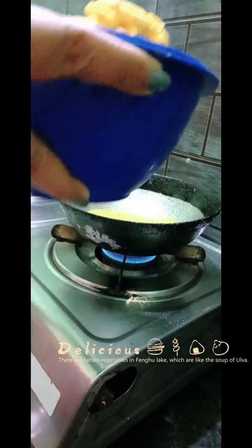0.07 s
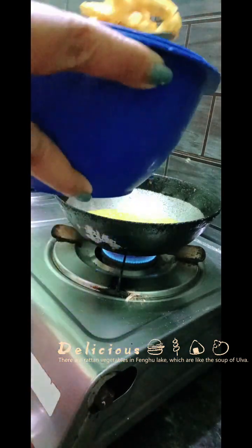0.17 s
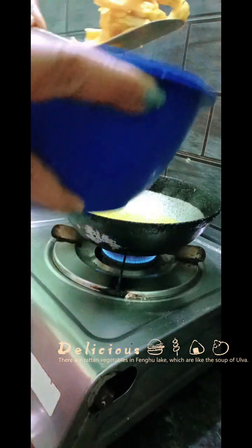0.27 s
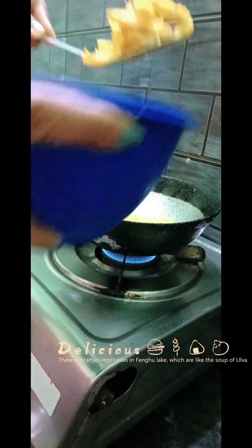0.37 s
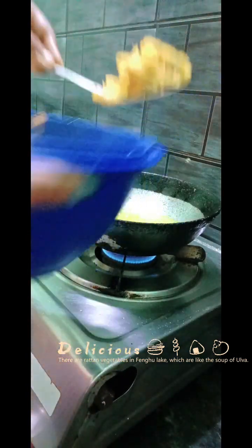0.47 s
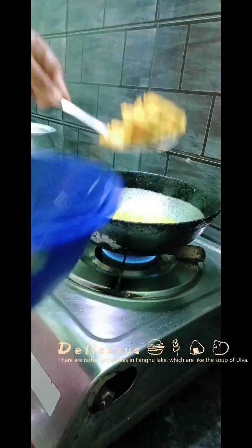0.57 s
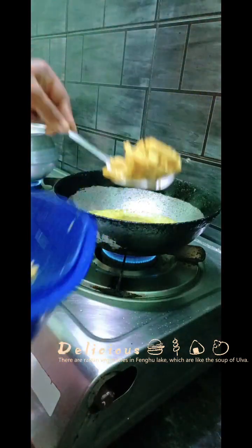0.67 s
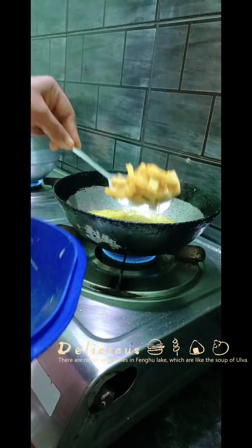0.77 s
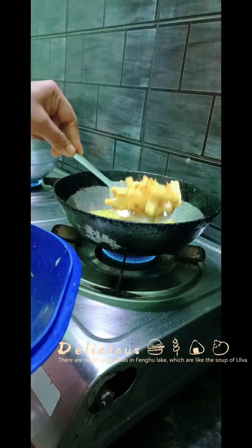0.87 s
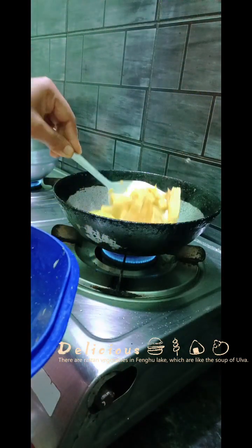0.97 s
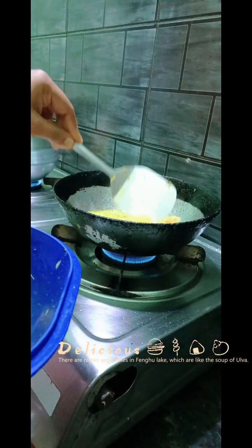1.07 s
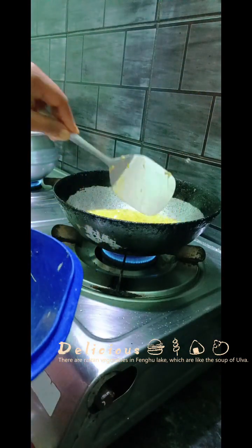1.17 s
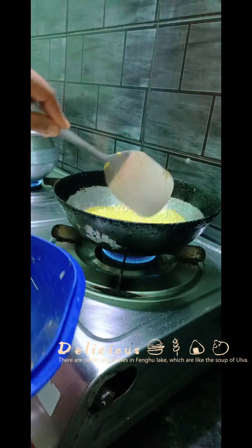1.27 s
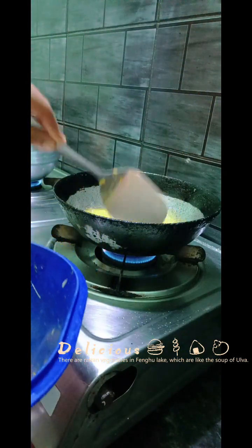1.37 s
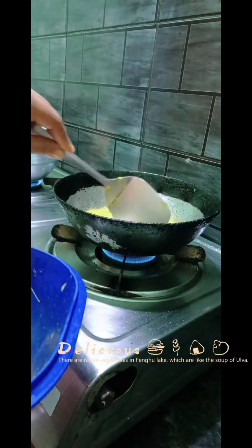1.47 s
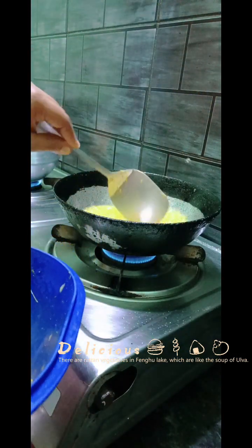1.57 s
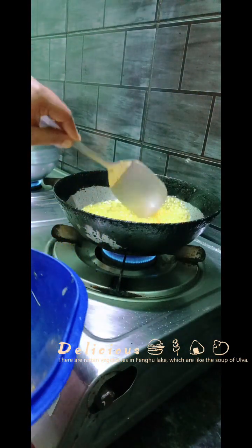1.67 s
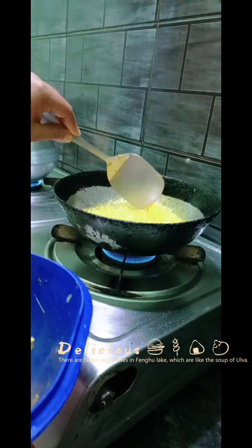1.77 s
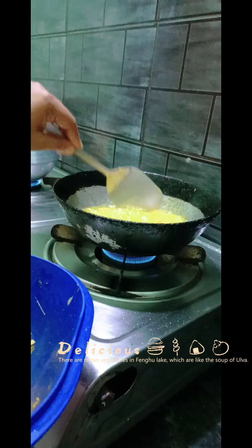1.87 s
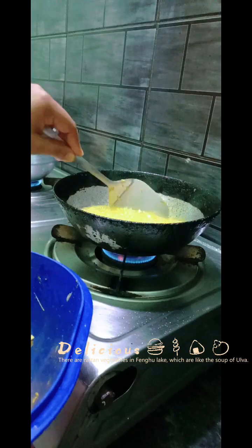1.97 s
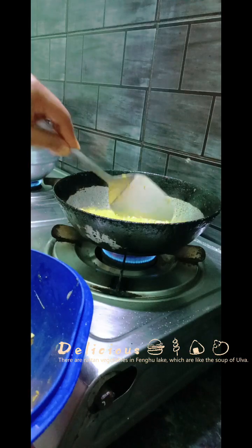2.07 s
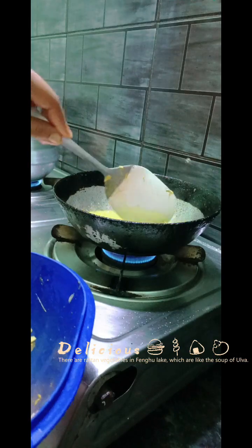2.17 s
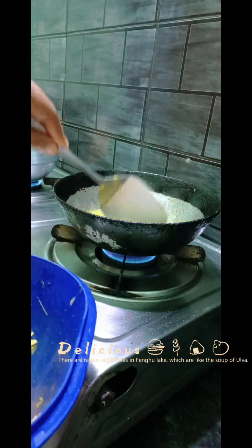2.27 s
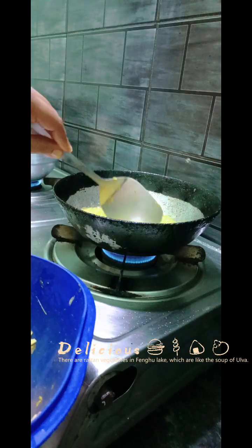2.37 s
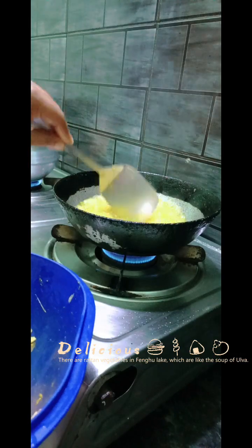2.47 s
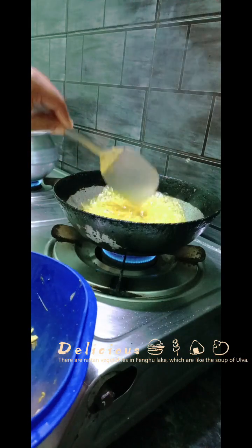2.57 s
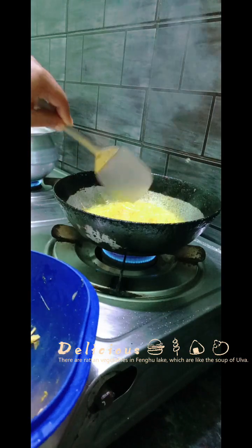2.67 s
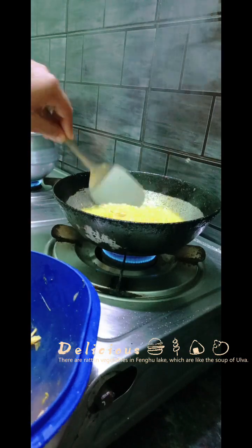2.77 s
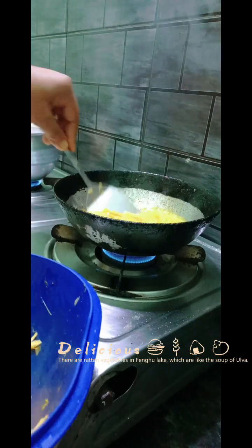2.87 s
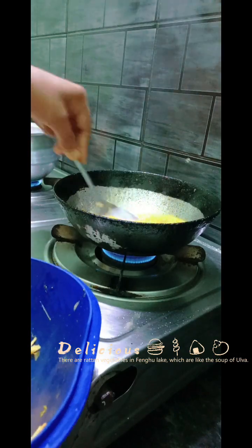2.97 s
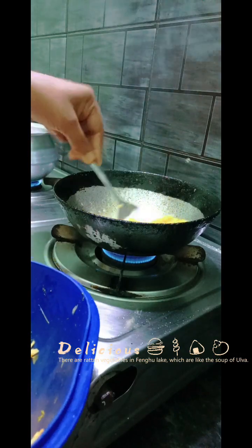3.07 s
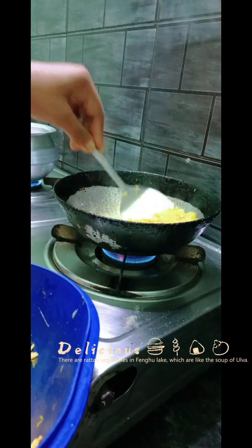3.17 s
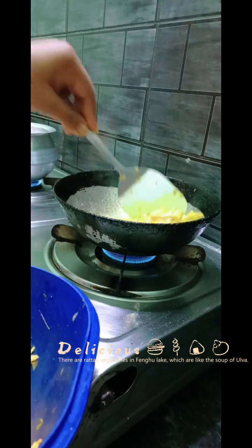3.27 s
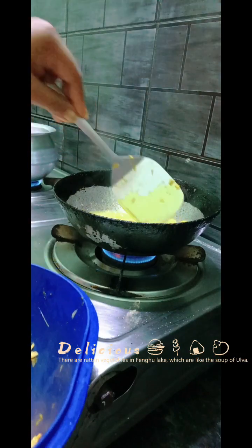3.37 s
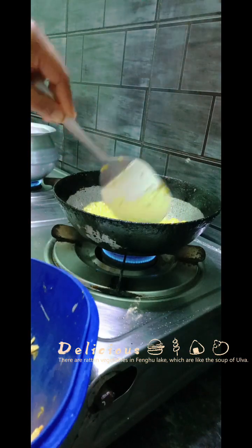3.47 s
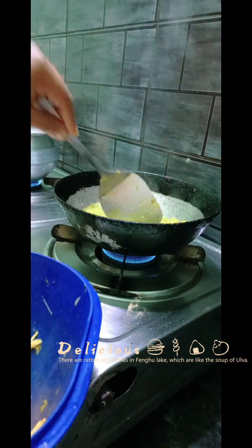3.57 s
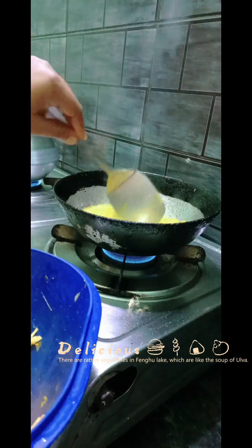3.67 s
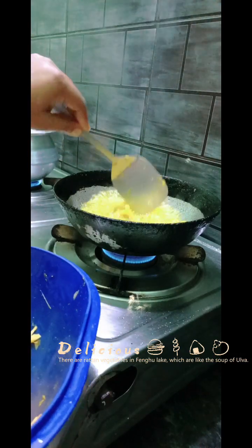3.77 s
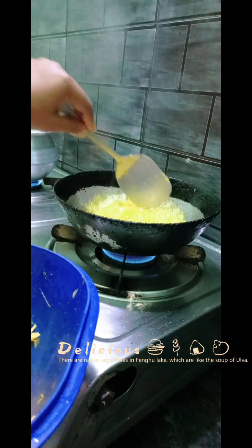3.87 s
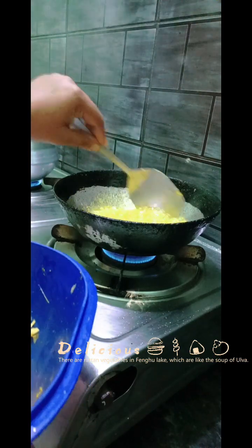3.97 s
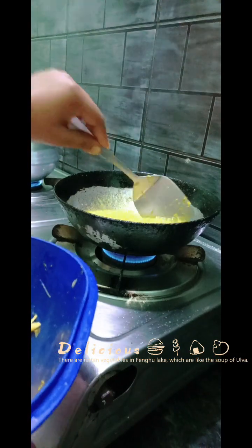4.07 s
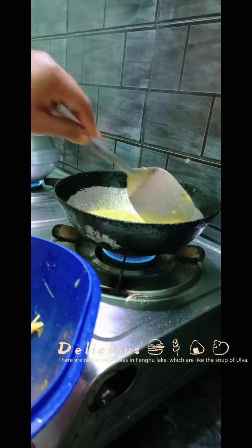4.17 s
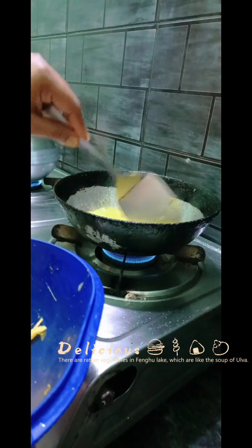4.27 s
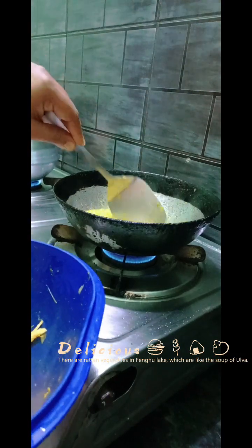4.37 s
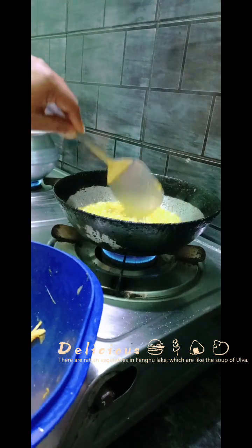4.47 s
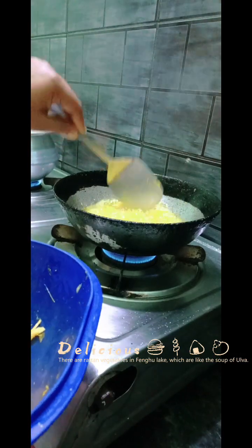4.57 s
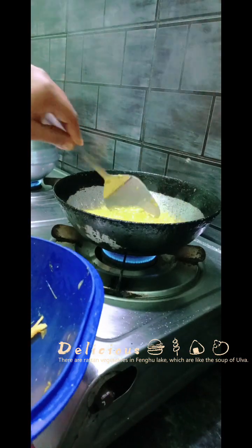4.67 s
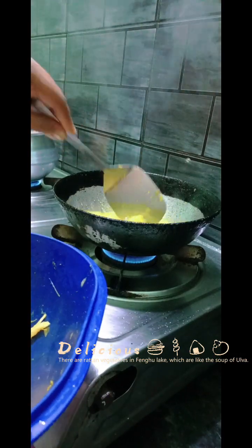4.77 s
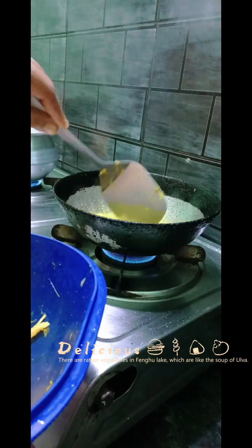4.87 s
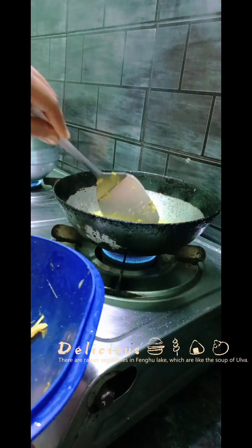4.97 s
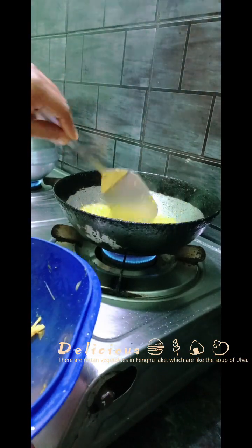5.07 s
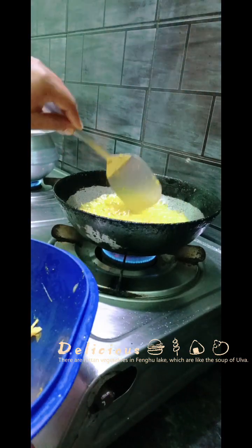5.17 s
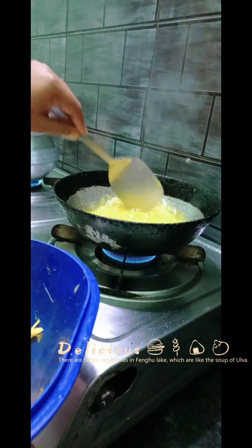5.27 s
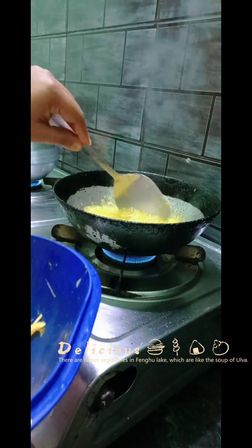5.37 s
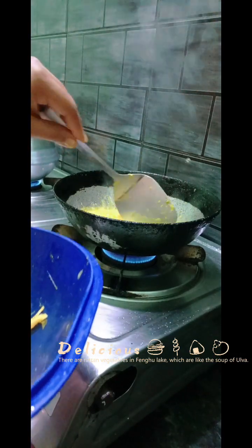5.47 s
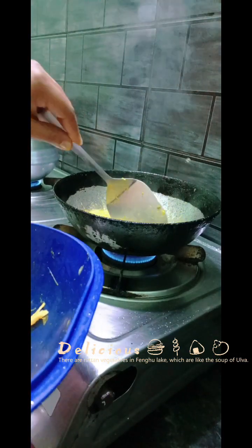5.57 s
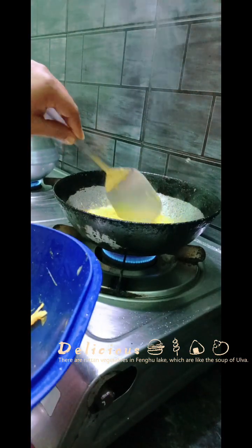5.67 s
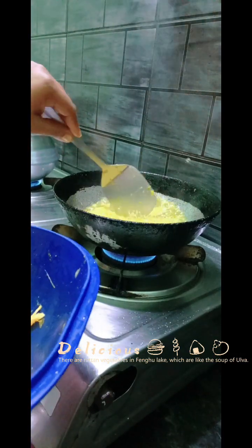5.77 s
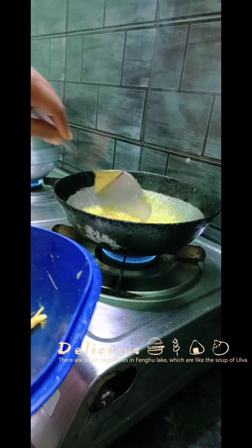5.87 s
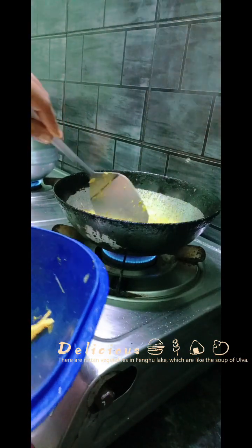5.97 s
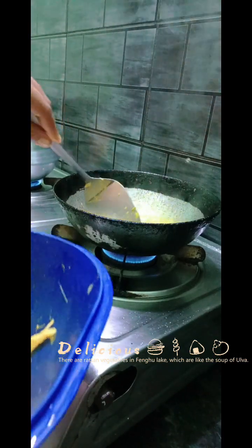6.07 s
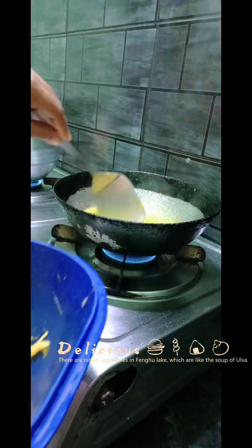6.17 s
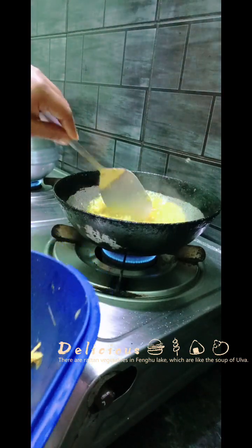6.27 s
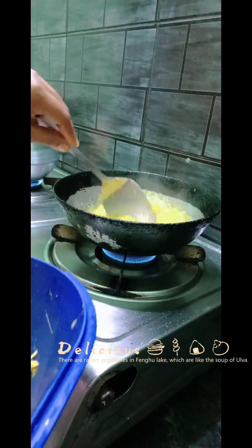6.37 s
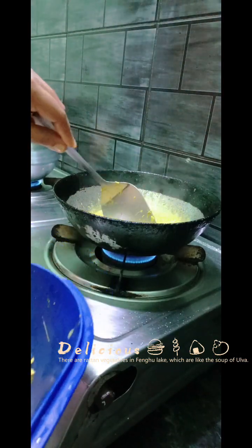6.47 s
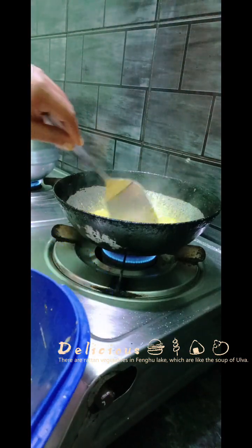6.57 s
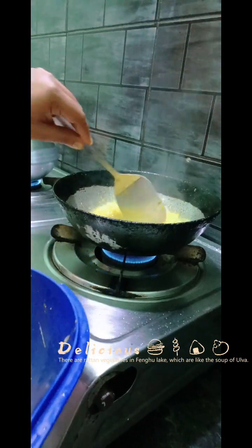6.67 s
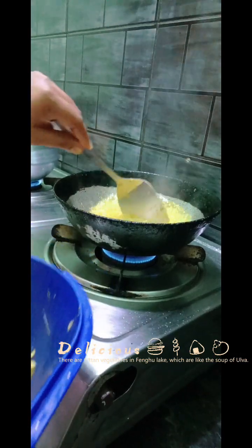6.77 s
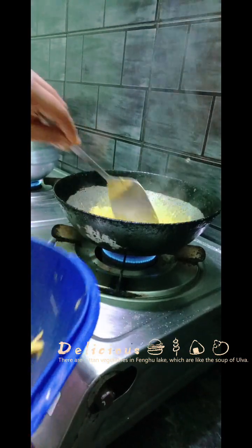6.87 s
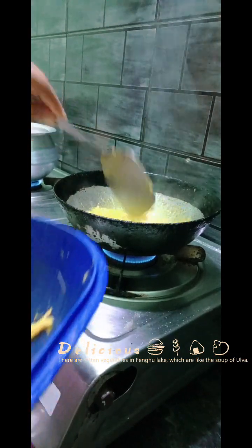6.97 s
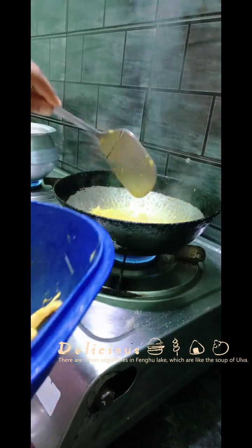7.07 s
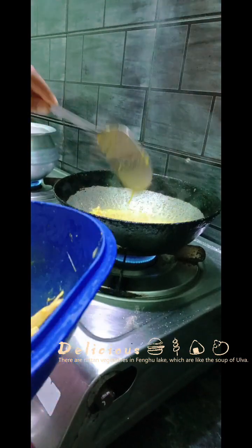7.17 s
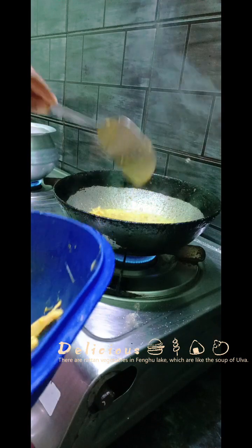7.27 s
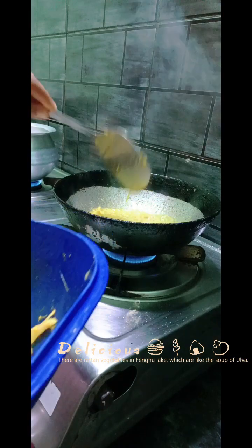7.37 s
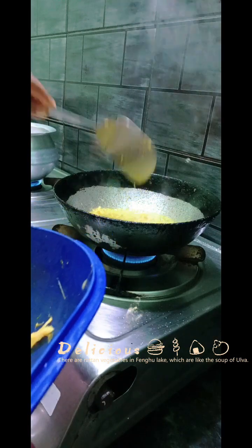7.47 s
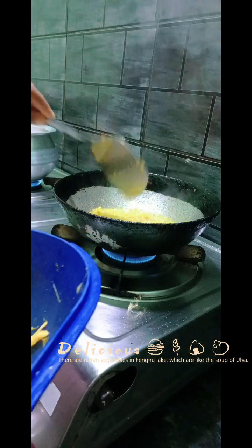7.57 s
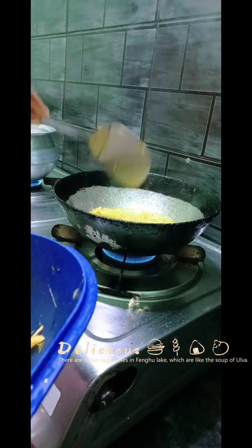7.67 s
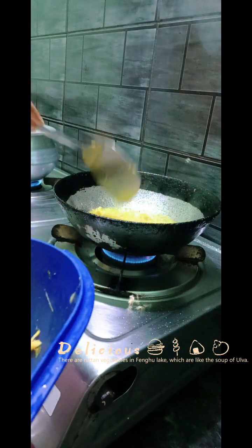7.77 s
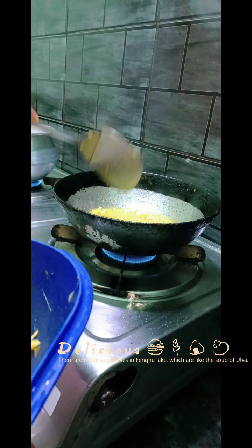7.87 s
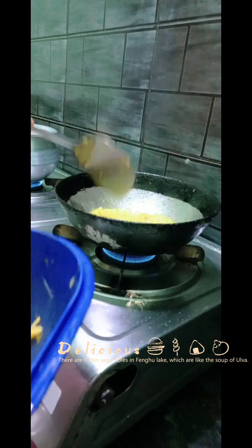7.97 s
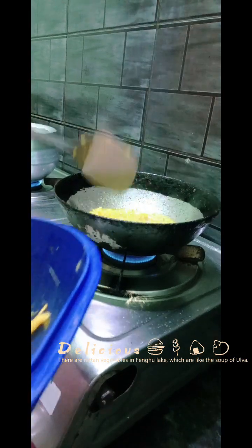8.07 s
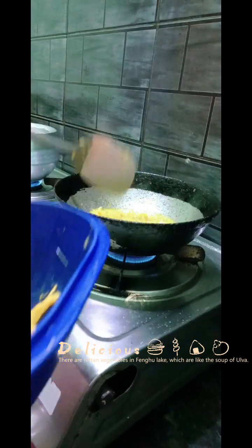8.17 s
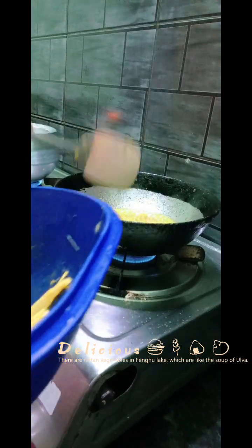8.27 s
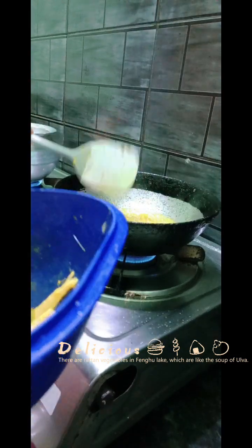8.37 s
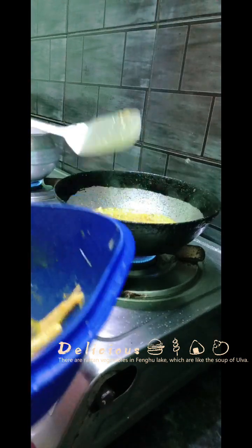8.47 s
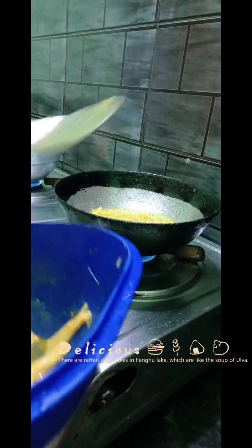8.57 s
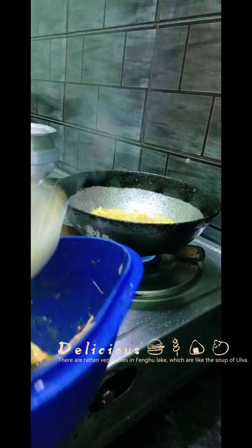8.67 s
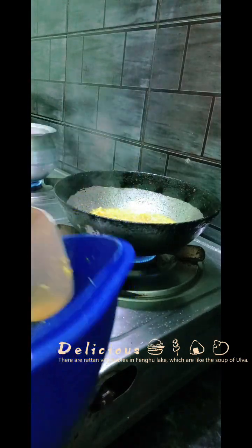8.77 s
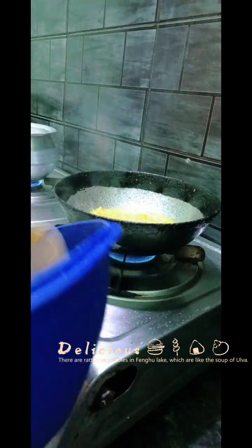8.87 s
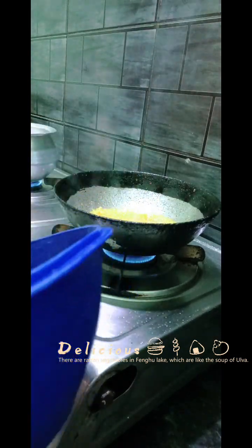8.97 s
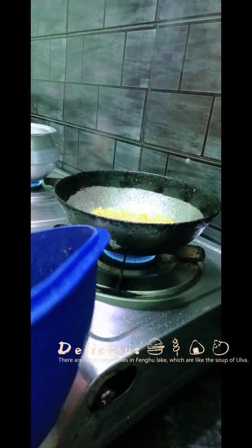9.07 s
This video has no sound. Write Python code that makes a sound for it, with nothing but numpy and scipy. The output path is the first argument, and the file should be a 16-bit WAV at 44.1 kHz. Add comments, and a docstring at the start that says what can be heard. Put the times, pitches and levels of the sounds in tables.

```python
"""In a tiled kitchen, wet pieces of food fry in a wok of hot oil: a dense fizz slowly dies down, with spits.
Fizz is noise driven by random bursts, spits are short noise bands, and lone bubbles are rising, dying tones.
A steel spatula knocks, scrapes and rubs the wok: decaying modes, filtered noise and narrow hums. A plastic
bowl is bumped (low noise bands) and tapped (short modes). The microphone's two ports differ in colour,
and its noise suppressor turns down the quiet bands, above all the low ones."""
import sys
import numpy as np
from scipy import signal
from scipy.fft import rfft, irfft, next_fast_len
from scipy.io import wavfile
from scipy.ndimage import uniform_filter1d

SR = 44100
rng = np.random.default_rng(int(sys.argv[2]) if len(sys.argv) > 2 else 0)


def pcm_store(signal):
    """Save signal as 16-bit PCM."""
    levels = np.round(np.clip(np.atleast_2d(signal), -1, 1) * 32767)
    wavfile.write(sys.argv[1], SR, levels.astype(np.int16).T)


N = 401732

# Spectrum of small bubbles and steam. Each row: frequency in Hz, relative density in dB.
FINE_SPECTRUM = [(1470, -59), (2500, -8), (2680, -9.5), (3070, -4), (3480, -4), (3720, -3.5), (4180, -6),
                 (5460, -1.5), (7250, -9.5), (8070, -15), (8780, -15.5), (9480, -16), (10600, -11),
                 (13400, -15), (15600, -22.5)]
# Vibration modes of the wok. Each row: frequency in Hz, relative level in dB, free decay t60 in seconds.
WOK_MODES = [(94.3, -2.5, 1), (133, -8, .4), (176, -12, 0.42), (219, -9.5, 0.75), (250, 2.5, 0.89),
             (268, -10, 0.6), (307.8, -1, 0.65), (350, -9, 1), (596.5, 2, 0.84), (699, -11, 0.29),
             (796, 6.5, 0.54), (873.6, -23, 0.22), (913, -16, 0.5), (1043, -16, 0.37), (1150, -23, .4),
             (1263, -10, .3), (1357, -12, 0.3), (1764, -9, .3), (1850, 12, 0.23), (2333, -16, .3),
             (2553, -3, .3), (2835, 0, .3), (3160, -15, .3), (5150, -20, .15)]


def gain_of(db):
    """Level and amplitude: 20 dB is a factor of ten."""
    return 10 ** (np.asarray(db) / 20)


def evened(x):
    """Normalisation: scales x to rms 1."""
    return x / np.sqrt(np.mean(abs(x) ** 2) + 1e-20)


def read(points, hz):
    """Interpolation of a table of (Hz, value) along logarithmic frequency."""
    f, value = np.transpose(points)
    return np.interp(np.log(hz + 1), np.log(f + 1), value)


def add(mix, s, sound):
    """Superposition: adds a sound to the mix from s seconds on."""
    part = mix[..., round(s * SR):][..., :sound.shape[-1]]
    part += sound[..., :part.shape[-1]]


def shaped(x, points):
    """Linear filtering: weights the spectrum of x by the table, at rms 1."""
    size = next_fast_len(N)
    weights = gain_of(read(points, np.fft.rfftfreq(size, 1 / SR)))
    return evened(irfft(rfft(x, size) * weights, size)[..., :N])


def arriving(x, lean_db=0):
    """Arrival differences: the right signal comes first, and is louder by lean_db."""
    lag = 6  # samples
    return gain_of([[-lean_db / 2], [lean_db / 2]]) * np.array([np.roll(x, lag), x])


def bubbles(per_s, spread_db, pops, patchy_db, size):
    """Modulated noise: steady hiss plus bursts of unequal size, livelier in changing bands (size in bins)."""
    sizes = gain_of(spread_db * np.minimum(rng.exponential(1, N), 4))
    bursts = sizes * (rng.random(N) < per_s / SR)
    decay = np.exp(-np.arange(200) / 76.0)  # time constant in samples, 1.7 ms
    activity = evened(signal.oaconvolve(bursts, decay)[:N])
    x = rng.standard_normal((2, N)) * np.sqrt(1 + (pops * activity) ** 2)
    z = signal.stft(x, nperseg=256, noverlap=128)[2]
    patches = uniform_filter1d(rng.standard_normal(z.shape[1:]), size, 0)  # across frequency
    patches = evened(uniform_filter1d(patches, 21, 1))  # along time
    return signal.istft(z * gain_of(patchy_db * patches), nperseg=256, noverlap=128)[1][:, :N]


def through_steel(x, width, lift_db):
    """Resonance: wok modes above 700 Hz stand out of noise; width in Hz at 1 kHz, growing as root frequency."""
    size = next_fast_len(N)
    hz = np.fft.rfftfreq(size, 1 / SR)
    peaks = sum(1 / (1 + (2 * (hz - f) / (width * np.sqrt(f / 1000))) ** 2) for f, _, _ in WOK_MODES if f > 700)
    return irfft(rfft(x, size) * np.sqrt(1 + gain_of(2 * lift_db) * peaks), size)[:, :N]


def pop(hz):
    """Bubble resonance: a few cycles that rise in pitch as they die."""
    cycles, glide = 4.1, 0.078  # cycles to lose 9 dB; share by which the pitch rises meanwhile
    turns = hz * np.arange(400) / SR
    phase = 2 * np.pi * turns * (1 + glide * turns / (2 * cycles))
    return np.minimum(turns, 1) * np.exp(-turns / cycles) * np.sin(phase)


def crackle():
    """Random superposition: small bubbles of every pitch burst all over the pan; a few are large."""
    out = np.zeros((2, N))
    per_s, spread_db, lean_db = 450, 3.2, 14  # rate, spread of size, widest lean to a side
    low_hz, high_hz = 1910, 7600
    for when, pitch, size, place in rng.random((per_s * N // SR, 4)):
        hz = low_hz * (high_hz / low_hz) ** pitch
        db = read(FINE_SPECTRUM, hz) - spread_db * max(np.log(size + 1e-9), -3.5)
        add(out, when * N / SR, gain_of(db) * arriving(pop(hz), lean_db * (2 * place - 1)))
    return evened(out)


def surges(t):
    """Gaussian envelopes: lifts of the fine fizz and deep boil in dB come and go smoothly."""
    # The noise level lifts or sinks briefly; at 4.62 and 8.779 s it jumps with a spatula strike.
    # Each row: middle in seconds, time from the middle to 1/e of the lift in seconds,
    # lift of fine fizz in dB, lift of deep boil in dB.
    lifts = [(0.507, 0.11, 0.5, 5.5), (0.723, 0.019, 4.5, 3), (1.036, 0.26, 3.5, 8), (1.565, 0.19, 2, 10),
             (1.898, 0.048, 0.5, -4), (2.957, 0.11, 0, 5.5), (3.26, 0.028, 1.5, 6), (3.412, 0.024, 4, -2.5),
             (3.827, 0.022, 0.5, -6), (4.197, 0.12, -0.5, -0.5), (4.29, 0.021, 0.5, 6.5),
             (4.62, 0.015, 2.5, 13), (4.832, 0.26, -1.5, 4), (5.786, 0.1, 3.5, -2.5),
             (5.984, .08, 0.5, -0.5), (6.266, 0.16, 2, 6.5), (6.537, 0.056, -1, -1),
             (6.766, 0.076, 0.5, 4.5), (7.743, 0.16, -2.5, -5), (8.779, 0.01, 6.5, 3)]
    s, length, fine_db, deep_db = (c[:, None] for c in np.transpose(lifts))
    swell = np.exp(-((t - s) / length) ** 2)
    return (fine_db * swell).sum(0), (deep_db * swell).sum(0)


def frying():
    """Boiling noise: three sizes of bubble; the deep boil follows the large bubbles and dies faster."""
    # Course of the frying before swells and brief lifts.
    # Each row: time in seconds, level of fine fizz in dB, level of large bubbles in dB.
    course = [(0, -30.5, -31.5), (.6, -32, -33), (.92, -35.5, -35), (1.3, -33, -34), (1.7, -30.5, -32.5),
              (2.3, -30, -30.5), (2.64, -28, -30.5), (3.1, -31.5, -30.5), (3.8, -31.5, -31.5),
              (4.5, -30.5, -33), (5.0, -31.5, -34.5), (5.6, -34.5, -35.5), (6.3, -34.5, -35),
              (6.8, -34, -38.5), (7.0, -35.5, -40), (7.8, -36, -43), (8.2, -38, -45.5), (8.6, -38, -47.5),
              (9.11, -39, -45.5)]
    # Spectra of large bubbles and of the deep boil. Each row: frequency in Hz, relative density in dB.
    large_spectrum = [(1000, -28.5), (1280, -10.5), (1600, -2.5), (2100, 2.5), (3100, 0.5), (4200, -5.5),
                      (6000, -34)]
    deep_spectrum = [(500, -17.5), (680, -11.5), (790, -2.5), (950, 4.5), (1150, 0.5), (1350, 1.5),
                     (1600, 6.5), (2000, -36), (2600, -41)]
    s, *columns = np.transpose(course)
    frames, t = np.arange(0, N + 64, 64) / SR, np.arange(N) / SR
    fine_db, large_db = (np.interp(frames, s, c) for c in columns)
    fine_lift_db, deep_lift_db = surges(frames)
    # the deep boil is at -44 dB when large bubbles are at -31.5, and moves 1.86 dB for each dB of theirs
    deep_db = -44 + 1.86 * (large_db + 31.5) + deep_lift_db

    fine = shaped(bubbles(per_s=380, spread_db=5.5, pops=0.21, patchy_db=1.05, size=5), FINE_SPECTRUM)
    large = shaped(bubbles(per_s=88, spread_db=-3.0, pops=0.23, patchy_db=2.0, size=2), large_spectrum)
    deep = shaped(bubbles(per_s=96, spread_db=1.5, pops=0.4, patchy_db=2.5, size=1), deep_spectrum)
    large = evened(through_steel(large, width=4.1, lift_db=7.5))
    deep = evened(through_steel(deep, width=9.1, lift_db=9.0))

    # fine fizz and large bubbles swell unevenly together, by 0.48 dB rms below 10.6 Hz
    slow = signal.lfilter(*signal.butter(2, 10.6, fs=SR / 64), rng.standard_normal(len(frames)))
    swell_db = 0.48 * evened(slow)
    # until the fresh food lands the top of the fizz is duller
    landing_s, top_hz, dull_db = 0.99, 8240, -3
    top = signal.sosfiltfilt(signal.butter(3, top_hz, "high", fs=SR, output="sos"), fine)
    fine = fine - (1 - gain_of(np.where(t < landing_s, dull_db, 0))) * top
    fine = fine + gain_of(-8) * crackle()

    courses = fine_db + fine_lift_db + swell_db, large_db + swell_db, deep_db
    levels = gain_of([np.interp(t, frames, db) for db in courses])
    return levels[0] * fine + levels[1] * large + levels[2] * deep


def room():
    """Stationary noise: the burner and room as noise of fixed spectrum."""
    # Spectrum of burner and room. Each row: frequency in Hz, relative density in dB.
    spectrum = [(15, -53), (25, -7), (60, -11), (109, -6.5), (162, -15), (266, -6), (309, -8), (598, -6),
                (628, -6.5), (1300, -8), (1690, -39), (2860, -120)]
    return gain_of(-58) * shaped(rng.standard_normal((2, N)), spectrum)


def puff(noise, hz, width):
    """Resonant filtering: noise passed twice through one resonance, rms 1; width in Hz for one pass."""
    r = np.exp(-np.pi * width / SR)
    poles = [1, -2 * r * np.cos(2 * np.pi * hz / SR), r * r]
    once = signal.lfilter([1, -1], poles, noise)
    return evened(signal.lfilter([1, -1], poles, once))


def held(x):
    """Envelope compression: evens out the level of a narrow noise."""
    wobble = 0.66  # the larger, the more the level still wavers
    return evened(x / (abs(signal.hilbert(x)) + wobble))


def spits():
    """Bursting water: flickering noise bands around the bubble pitch; some large bubbles burst alone."""
    # Water pockets bursting. Each row: start in seconds, level in dB, bubble pitch in Hz, length in seconds.
    pockets = [(0.0284, -31, 2800, 0.03), (0.124, -29.5, 3570, 0.031), (0.195, -33, 2940, 0.082),
               (0.369, -24.5, 2220, 0.016), (0.405, -36, 2300, 0.0056), (0.502, -30.5, 3960, 0.045),
               (0.581, -31, 1940, 0.025), (0.713, -43, 5500, .04), (0.982, -25, 3300, 0.0084),
               (0.994, -24.5, 3450, 0.021), (1.028, -25, 3200, 0.015), (1.048, -26, 3200, 0.024),
               (1.239, -34, 3200, .006), (1.283, -23.5, 2870, 0.0066), (1.29, -27, 2130, 0.015),
               (1.299, -29, 2790, 0.02), (1.506, -35, 5720, 0.043), (1.617, -33, 5300, 0.043),
               (1.648, -30, 5000, .035), (1.676, -27, 2500, 0.017), (1.823, -30.5, 2120, 0.071),
               (1.895, -33, 2180, .04), (2.1, -32.5, 2480, 0.06), (2.727, -24.5, 2100, 0.034),
               (2.746, -23, 2080, 0.029), (2.774, -27, 2300, .025), (2.802, -27, 2520, .04),
               (2.849, -28, 3150, 0.02), (3.13, -28, 2240, 0.032), (3.475, -32, 2420, 0.038),
               (3.41, -37, 4820, .03), (3.829, -29.5, 5340, 0.044), (3.996, -30, 4100, 0.042),
               (4.5, -31.5, 2220, 0.046), (4.693, -33, 4900, 0.036), (5.707, -37, 6370, .03),
               (6.206, -38, 5300, .04), (6.518, -33, 3100, 0.02), (6.528, -36, 2520, .016),
               (7.162, -35, 3650, 0.047), (7.333, -35.5, 4460, 0.037), (7.972, -38, 3090, 0.042),
               (8.065, -39, 4000, .03), (8.202, -39, 2480, 0.044), (8.46, -44, 2530, .04),
               (8.869, -37.5, 2030, 0.044), (9.056, -40, 2590, 0.052), (9.073, -42, 1780, 0.021)]
    # Loudest single bubbles. Each row: start in seconds, level in dB, starting pitch in Hz.
    lone_bubbles = [(1.63, -21, 5400), (1.6685, -16, 5000), (1.679, -24, 2700), (1.689, -18, 5500),
                    (1.7297, -17, 5510), (1.832, -18, 2170), (2.788, -18, 2060), (3.477, -19, 2670),
                    (3.5565, -15, 3160), (7.572, -22, 5000), (7.767, -24, 5500), (7.818, -30, 2280),
                    (8.457, -25, 5250), (8.497, -21, 5470)]
    grain_s, grain_db, rise_s = 0.0029, -1, 0.00078  # step and spread of the flicker; attack
    pitch_width = 0.24  # share of the bubble pitch
    out, t = np.zeros((2, N)), np.arange(8000) / SR
    for (s, db, hz, length), noise in zip(pockets, rng.standard_normal((len(pockets), 3, 8000))):
        flicker = evened(gain_of(grain_db * np.interp(t / grain_s, np.arange(8000), noise[2])))
        shape = np.minimum(t / rise_s, 1) * np.sqrt(np.clip(1 - t / length, 0, 1))
        add(out, s, gain_of(db) * shape * flicker * held(puff(noise[:2], hz, pitch_width * hz)))
    for s, db, hz in lone_bubbles:
        add(out, s, gain_of(db) * arriving(pop(hz), lean_db=7))
    return out


def ring(modes, colour_db, share):
    """Modal synthesis: decaying partials; neighbours start in opposite directions."""
    t = np.arange(SR // 3) / SR  # a third of a second
    hz, db, t60 = (c[:, None] for c in np.transpose(modes))
    decay = gain_of(db + colour_db[:, None] - 60 * t / (share * t60))
    rise = np.minimum(hz * t, 1)  # each mode builds up over one cycle
    partials = decay * np.sin(2 * np.pi * hz * t) * rise
    return (-1.) ** np.arange(len(modes)) @ partials


def blow(rattle, tick):
    """Contact force: a first tick, then decaying chatter on the surface (rattle is its t60 in s); energy 1."""
    force = rng.standard_normal(4000) * gain_of(-60 * np.arange(4000) / SR / rattle)
    force[0] = tick * np.linalg.norm(force)
    return force / np.linalg.norm(force)


def wok():
    """Modal excitation and decay: the place struck colours the ring; the next knock or cutoff ends it."""
    # The blade lands on the wok. Each row: start in seconds, overall level in dB, # then colour relative to 250
    # Hz in dB near 140, 310, 600 and 850 Hz.
    landings = [(0.978, -57, 11.5, -11, -23, -11), (1.006, -48.5, 4, -0.5, -21, -4),
                (1.075, -48, 2, -4, -11, -5), (1.239, -56, 5, -11, -20, -10), (1.49, -59, 9, 0, -17, -10),
                (1.842, -41.5, -10, -9, -31, -24), (1.888, -52.5, -13, 10, -3, 1),
                (1.945, -53, -20, 0, -12, -6), (2.599, -52, -22, -13, -5, -15),
                (2.692, -39.5, -30, -1, -12, -25), (2.733, -39, -25, -12, -16, -16),
                (2.748, -42.5, -10, 7.5, -5, -21), (2.812, -37, -10, -6, -23, -22),
                (2.869, -48.5, 0, 6, -20, -9), (2.958, -47.5, -6, -3, -6, -15),
                (3.047, -51.5, -27, -7, -32, -10), (3.157, -53.5, -15, -21, -1.5, 0),
                (3.359, -59.5, -17, -0.5, -21, -16), (3.922, -41.5, -35, -10, -12, -19),
                (4.021, -45, -33, -10, -33, -23), (4.603, -41, -29, -2.5, -3, -6.5),
                (4.728, -50.5, -20, -24, -24, -11), (6.062, -56.5, -23, -15, -4, -3),
                (6.112, -47.5, -21, -28, -38, -16), (6.292, -46.5, -26, -2, -18, -7),
                (6.65, -60, -3, -3, -14, -8), (6.674, -55, -14, 4, -13, -12),
                (6.731, -54.5, -12, 6, -8, -3)]
    # The ring is cut short. Each entry: time in seconds.
    cutoffs = [1.21, 1.36, 1.58, 1.878, 2.065, 2.722, 2.793, 2.856, 3.25, 3.46, 3.995, 4.27, 4.705, 4.84,
               6.25, 6.36, 6.722, 6.785]
    out, hz, t = np.zeros(N), np.transpose(WOK_MODES)[0], np.arange(SR // 3) / SR
    starts = np.transpose(landings)[0]
    ends = np.sort(np.concatenate([starts, cutoffs, [np.inf]]))
    following = ends[np.searchsorted(ends, starts, "right")]
    for (s, db, low, second, third, fourth), end in zip(landings, following):
        colour = read([(140, low), (250, 0), (309, second), (597, third), (850, fourth),
                       (1200, -15), (2500, -7)], hz)
        modal_ring = ring(WOK_MODES, colour, share=0.93)  # slightly shorter than the free ring
        sound = signal.fftconvolve(modal_ring, blow(rattle=0.04, tick=8.9))[:len(t)]
        fade = np.exp(-np.maximum(t - (end - s), 0) / 0.0074)  # time constant in s
        add(out, s, gain_of(db) * sound * fade)
    return out


def scraping():
    """Friction noise: uneven bursts through the wok's resonances; each stroke starts quickly and fades."""
    # The spatula drags over the steel; the row at 8.78 s is the noise of its tap on the plastic bowl.
    # Each row: start in seconds, level in dB, length in seconds, treble lift and equal bass cut in dB.
    strokes = [(0.998, -44, 0.096, 8), (1.424, -44.5, 0.22, 7.5), (1.837, -36.5, 0.39, 2),
               (2.699, -33.5, 0.16, -5), (2.843, -44, 0.38, 6.5), (3.887, -41.5, 0.22, 4.5),
               (4.609, -29.5, 0.11, -4), (4.727, -62, 0.16, 0), (6.03, -44, 0.2, 1),
               (6.266, -34, 0.16, -2.5), (6.65, -36.5, 0.16, -1), (6.8, -58, 0.1, -9),
               (8.78, -49, 0.099, 9)]
    # Spectrum of the slips. Each row: frequency in Hz, relative density in dB.
    spectrum = [(200, -8.5), (400, -3), (800, -2), (1500, 5), (2500, 5.5), (4000, -12)]
    out, t = np.zeros((2, N)), np.arange(SR // 3) / SR
    slips = shaped(bubbles(per_s=140, spread_db=5.0, pops=0.46, patchy_db=1.0, size=2), spectrum)
    slips = evened(through_steel(slips, width=8.0, lift_db=8.5))
    low = signal.lfilter(*signal.butter(2, 1100, fs=SR), slips)
    high = slips - low
    for s, db, length, bright in strokes:
        at = slice(round(s * SR), round(s * SR) + len(t))
        sound = gain_of(-bright) * low[:, at] + gain_of(bright) * high[:, at]
        shape = np.minimum(t / 0.0066, 1) * np.sqrt(np.clip(1 - t / length, 0, 1))
        add(out, s, gain_of(db) * shape[:sound.shape[1]] * sound)
    return out


def cracks():
    """Impact noise: a tick and quickly decaying wide noise, coloured by three resonances."""
    # The blade's edge strikes bare steel. Each row: start in seconds, level in dB,
    # body frequency in Hz, level of each treble band over the body in dB.
    strikes = [(1.006, -35, 1250, -5), (1.821, -37, 1250, -5), (3.918, -33, 1240, -5),
               (4.603, -21, 1250, -1.5), (4.618, -30, 1000, -7), (6.05, -33, 1270, -5),
               (6.257, -27.5, 1400, -8), (6.321, -29.5, 2200, -8), (6.397, -39, 2200, -8),
               (6.652, -29, 1690, -11), (6.68, -40, 1800, -10)]
    edge_tick, t60 = 9, 0.022  # first tick over the noise; decay in s
    out, t = np.zeros((2, N)), np.arange(2000) / SR
    for (s, db, hz, treble_db), noise in zip(strikes, rng.standard_normal((len(strikes), 2, 2000))):
        noise = noise + edge_tick * (t == 0)
        treble = puff(noise, 2300, 1000) + puff(noise, 4700, 1800)
        colour = puff(noise, hz, 660) + gain_of(treble_db) * treble
        add(out, s, gain_of(db - 60 * t / t60) * colour)
    return signal.lfilter(*signal.butter(4, 6240, fs=SR), out)  # little is left above this


def hums():
    """Friction-driven resonance: noise in one narrow mode starts quickly and fades as the rub ends."""
    # The rubbing blade makes one wok mode sing.
    # Each row: start in seconds, level in dB, mode frequency in Hz, length in seconds.
    rubs = [(1.23, -50.5, 797, 0.1), (1.43, -45, 798, 0.074), (1.504, -42, 1280, 0.05),
            (1.581, -59, 800, 0.055), (2.447, -44, 916, 0.04), (2.556, -46.5, 796, 0.032),
            (2.706, -50, 598, 0.052), (4.088, -56, 606, 0.06), (4.756, -53, 904, 0.063),
            (5.497, -59.5, 784, 0.11), (5.705, -53, 924, 0.036), (5.88, -55, 1043, .11),
            (6.255, -46, 880, .03), (6.288, -40, 870, 0.032), (6.363, -52.5, 681, .12),
            (6.38, -42, 847, 0.022), (6.414, -54.5, 900, 0.073), (6.763, -53.5, 1035, 0.062),
            (6.831, -52.5, 918, 0.085)]
    width_hz, rise_s = 25, 0.0038
    out, t = np.zeros(N), np.arange(8000) / SR
    for (s, db, hz, length), noise in zip(rubs, rng.standard_normal((len(rubs), 12000))):
        shape = np.minimum(t / rise_s, 1) * np.clip(1 - t / length, 0, 1) ** 0.21
        settled = held(puff(noise, hz, width_hz))[-len(t):]  # the resonance has built up
        add(out, s, gain_of(db) * shape * settled)
    return out


def bowl():
    """Cavity and plate resonance: dull bumps and rubs in hollow plastic, and sharp taps."""
    # The bowl bumped or rubbed. Each row: start in seconds, level in dB, hollow resonance in Hz,
    # width in Hz, length in seconds, share of the length spent rising.
    bumps = [(1.52, -58, 97, 23, 0.13, .2), (1.53, -60, 370, 51, 0.098, .4), (1.67, -56, 97, 37, .08, .7),
             (4.682, -58, 103, 35, .22, .5), (5.062, -60, 90, 44, 0.23, .3), (5.52, -60, 85, 46, .12, .5),
             (5.977, -56.5, 96, 29, 0.36, 0.21), (6.379, -48.5, 146, 96, 0.18, 0.2),
             (6.41, -40, 170, 100, .022, .3), (6.555, -52.5, 134, 45, 0.046, .4),
             (6.6, -55, 134, 27, 0.105, 0.65), (7.162, -51.5, 144, 47, 0.16, 0.14),
             (7.17, -53.5, 203, 43, 0.17, 0.29), (8.023, -59.5, 95, 20, 0.15, .5),
             (8.314, -58.5, 358, 27, 0.23, 0.54), (8.422, -58.5, 250, 42, 0.1, 0.4),
             (8.54, -62.5, 250, 20, 0.14, 0.64), (8.783, -53, 99, 72, 0.067, .2),
             (8.832, -59.5, 356, 18, 0.13, 0.65), (8.874, -53, 100, 50, 0.034, .3),
             (9.053, -51, 640, 110, 0.13, 0.61)]
    # Modes of the bowl. Each row: frequency in Hz, relative level in dB, t60 in seconds.
    modes = [(653, -4, 0.068), (793, -4, 0.17), (1410, 10.5, 0.02), (1880, -3, .03), (2380, 7, 0.02),
             (3180, 6, 0.027), (4530, 6, 0.018), (7200, 1, 0.018), (9800, -8, .015), (12400, 3, .015)]
    # The spatula strikes the bowl and bounces. Each row: start in seconds, level in dB.
    taps = [(8.774, -29.5), (8.797, -42.5)]
    out, t = np.zeros((2, N)), np.arange(SR // 3) / SR
    for (s, db, hz, width, length, rise), noise in zip(bumps, rng.standard_normal((len(bumps), len(t)))):
        shape = np.interp(t / length, [0, rise, 1], [0, 1, 0]) ** 0.39
        add(out, s, gain_of(db) * shape * arriving(held(puff(noise, hz, width))))
    for s, db in taps:
        free_ring = ring(modes, np.zeros(len(modes)), share=1)
        sound = signal.fftconvolve(free_ring, blow(rattle=0.008, tick=4.0))
        add(out, s, gain_of(db) * arriving(sound, lean_db=5))
    return out


def kitchen(x, t60):
    """Reverberation: tiled walls return a short diffuse tail."""
    tail = rng.standard_normal((2, SR // 3)) * gain_of(-60 * np.arange(SR // 3) / SR / t60)
    tail[:, :130] = 0  # the first 3 ms are silent
    tail = signal.lfilter(*signal.butter(2, 450, "high", fs=SR), tail)  # the small room returns little bass
    return signal.fftconvolve(x, tail / np.linalg.norm(tail[0]), axes=1)[:, :N]


def ports(a, b):
    """Coherence: two signals become the partly alike signals of the two ports."""
    # Colour of the ports. Each row: frequency in Hz, left over right in dB.
    balance = [(300, 0.5), (1200, -0.5), (2300, -2), (4200, -2.5), (5400, -3.5), (6700, -6), (7900, -8),
               (8450, -2.5), (8950, 0), (9500, 6.5), (10000, 18), (10500, 11.5), (11100, 6), (15000, 7.5)]
    # Likeness of the ports. Each row: frequency in Hz, share of the left signal in the right, 0 to 1.
    likeness = [(30, 0.82), (100, 1), (300, 1), (550, 0.34), (900, 0.27), (2000, 0.11), (3200, 0.3),
                (4300, 0.23), (8000, 0.28)]
    # Phase of the shared part. Each row: frequency in Hz, lead of the right in radians.
    phase_lead = [(100, 0.44), (600, 0.5), (1000, 2.3), (3000, 2.26), (4200, 3.44), (5200, 5.14),
                  (7000, 1.6)]
    size = next_fast_len(N)
    hz = np.fft.rfftfreq(size, 1 / SR)
    same, left = np.clip(read(likeness, hz), 0, .99), rfft(a, size)
    shared = same * left * np.exp(1j * read(phase_lead, hz))
    right = shared + np.sqrt(1 - same ** 2) * rfft(b, size)
    tilt = gain_of(read(balance, hz) / 2)
    return irfft(np.array([left * tilt, right / tilt]), size)[:, :N]


def scene():
    """Superposition: frying, blows with their reverberation, and room noise reach the two ports."""
    blows = scraping() + spits() + cracks() + bowl() + arriving(wok() + hums())
    return ports(*(frying() + blows + gain_of(-7.5) * kitchen(blows, t60=0.3) + room()))


def record(dry):
    """Spectral gating: bands with local power under a threshold are cut; deep bass and top are filtered."""
    # Suppressor threshold. Each row: frequency in Hz, power density in dB per Hz.
    threshold = [(100, -79), (300, -87.5), (700, -81.5), (1200, -77.5), (1350, -91), (2200, -105),
                 (16000, -140)]
    dry = signal.lfilter(*signal.butter(2, 41.0, "high", fs=SR), dry)  # the microphone loses deep bass
    hz, _, z = signal.stft(dry, SR, nperseg=1024, noverlap=768, scaling="psd")
    power = uniform_filter1d((abs(z) ** 2).mean(0), size=3, axis=0)
    power = uniform_filter1d(power, size=9, axis=1)
    over_db = 10 * np.log10(power + 1e-20) - read(threshold, hz)[:, None]
    shut = 1 / (1.5 + np.exp(np.clip(over_db / 1.07, -30, 30)))  # at most 2/3, a cut of 10 dB
    out = signal.istft(z * gain_of(-15. * shut), SR, nperseg=1024, noverlap=768, scaling="psd")[1][:, :N]
    low_pass = signal.firwin(511, 15650, window=("kaiser", 9), fs=SR)
    return signal.oaconvolve(out, low_pass[None], "same")


dry = scene()
out = record(dry)
pcm_store(out)
```